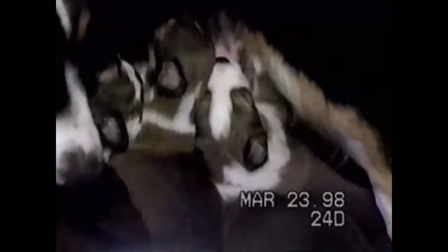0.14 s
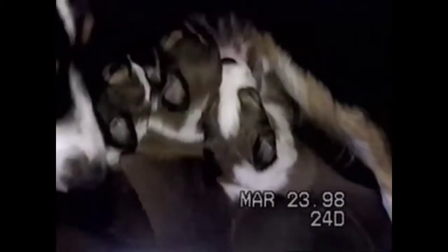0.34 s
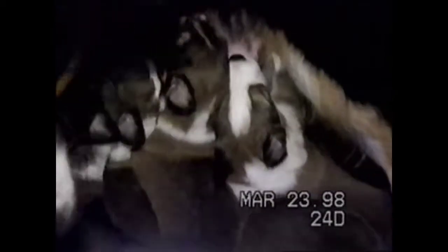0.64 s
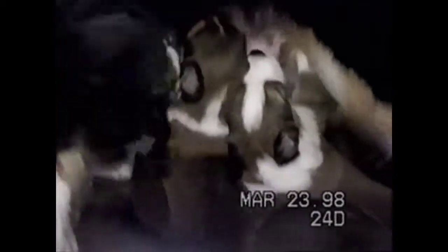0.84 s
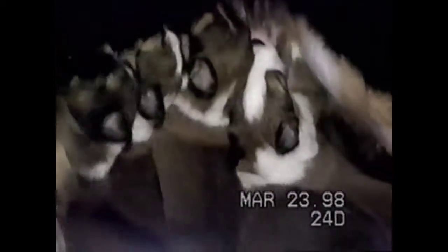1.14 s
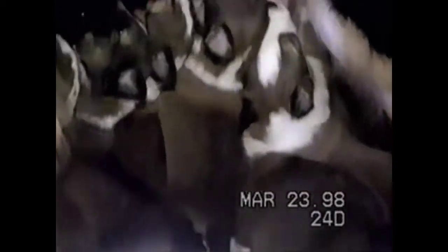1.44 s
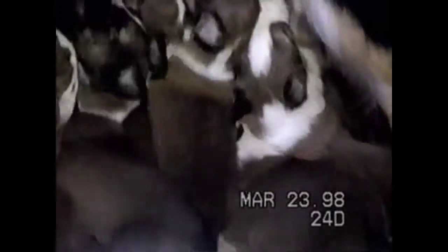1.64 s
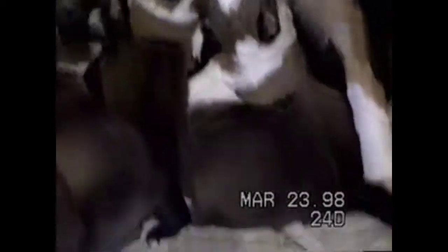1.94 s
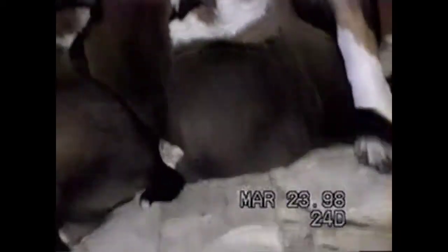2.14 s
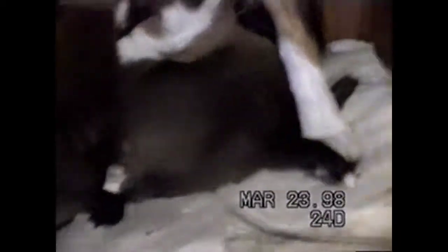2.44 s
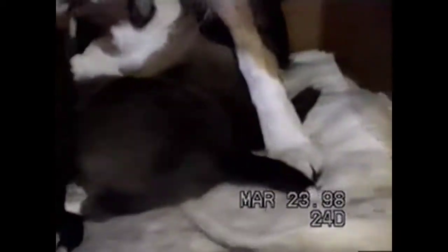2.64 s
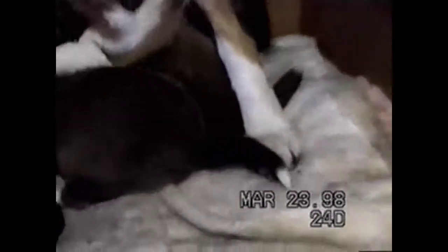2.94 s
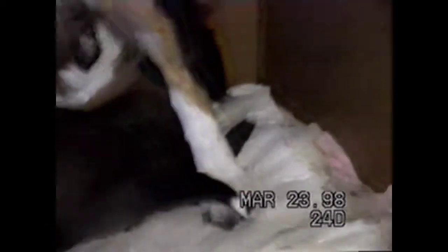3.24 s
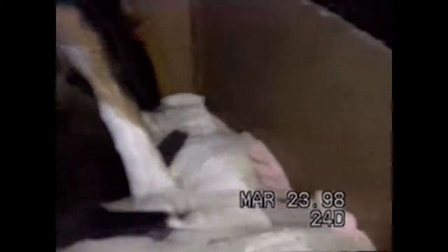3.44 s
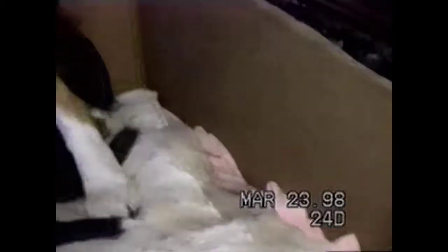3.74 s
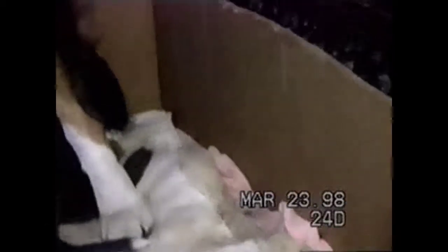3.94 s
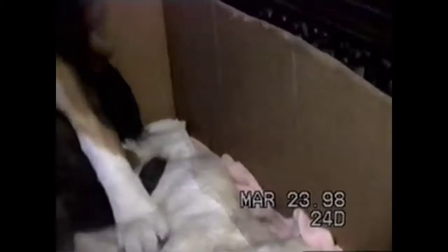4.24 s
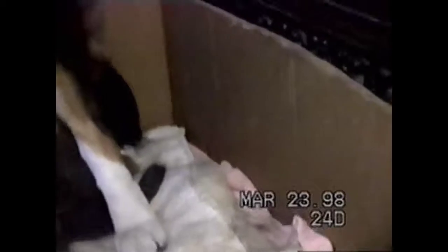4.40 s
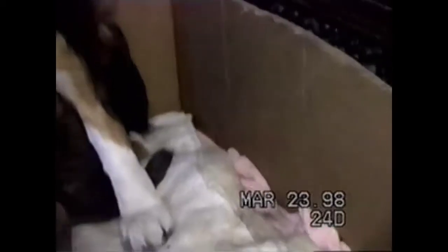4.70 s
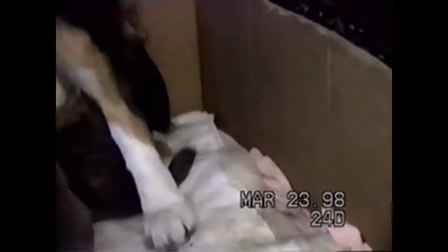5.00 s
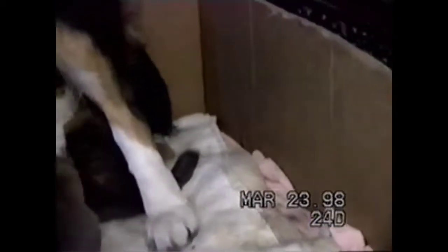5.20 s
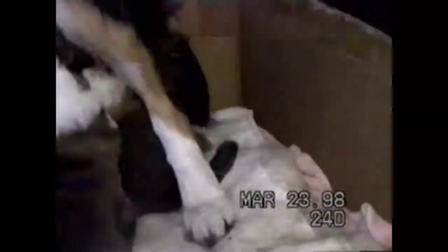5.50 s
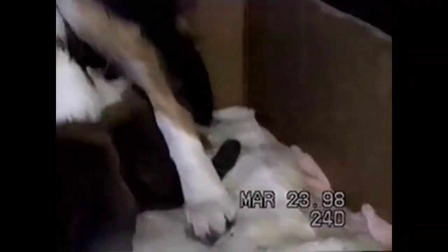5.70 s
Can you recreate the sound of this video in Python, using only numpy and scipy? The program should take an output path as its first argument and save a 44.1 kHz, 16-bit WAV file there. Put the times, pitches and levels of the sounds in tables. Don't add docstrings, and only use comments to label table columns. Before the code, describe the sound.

A young puppy whines close to the microphone in a small, fairly dry room, over low rumble, soft tape hiss and a very faint motor whine. A weak, thin squeak begins at once and swells to 0.3 s. At 0.5 s a stronger cry rises from a hoarse start to a clear high note. Longer cries follow at 1.0 and 1.7 s, each pushed again midway, the second fading; a tap lands at 1.7 s. A distant litter mate whines faintly from 1.9 to 2.5 s. More cries flip sharply from low and raspy to high at 2.5 s, 3.0 s, the loudest, and 3.6 s, which is more nasal. After a throaty rasp, a short, weak last cry ends by 4.3 s. Then a tiny grunt at 4.55 s, scattered light claw ticks and soft smacks, and bedding rustling, strongest near 5.75 s, continue to the end at about 5.9 s.

```python
import sys
import numpy as np
from scipy import signal
from scipy.io import wavfile
from scipy.ndimage import uniform_filter1d, map_coordinates

SR = 44100
rng = np.random.default_rng(int(sys.argv[2]) if len(sys.argv) > 2 else 0)


def natural_amplitude(level_db):
    exponent = np.asarray(level_db, float) / 20
    return 10 ** exponent


def digitize_waveform(pressure):
    field = np.atleast_2d(pressure).T
    bounded = np.clip(field, -1, 1)
    quanta = np.round(bounded * 32767).astype(np.int16)
    wavfile.write(sys.argv[1], SR, quanta)


N = 258420

# start_s, pitch_hz, level_db [1st partial], mouth_db [overtones against the 1st]
CRY_WEAK = [(0, 1530, -39.5, -29), (.056, 1515, -43, -28), (.126, 1550, -47.5, -12), (.16, 1540, -59, -7),
            (.2, 1530, -48, -11), (.254, 1580, -36, -13.5), (.29, 1580, -27, -39), (.305, 1553, -23.5, -30)]
CRY_RISING = [(.485, 1114, -41.5, -20), (.512, 1076, -31, -8), (.535, 1258, -29, -1.5),
              (.56, 1378, -21, -23), (.61, 1435, -27, -56), (0.644, 1431, -26.5, -36),
              (0.699, 1404, -31, -31), (0.761, 1430, -24.5, -34), (.82, 1414, -33, -36)]
CRY_LONG = [(1.009, 1135, -41, -14), (1.03, 1059, -30.5, -12), (1.046, 968, -27.5, -7.5),
            (1.067, 1030, -29.5, -8), (1.082, 1017, -30, -5), (1.086, 1368, -21, -48),
            (1.12, 1456, -30, -40), (1.152, 1460, -45.5, -34),
            (1.172, 1427, -28.5, -46), (1.207, 1353, -30, -33), (1.259, 1395, -29.5, -36),
                 (1.31, 1395, -24.5, -31.5), (1.362, 1431, -31.5, -37), (1.45, 1384, -26.5, -36),
                 (1.49, 1444, -35.5, -35)]
CRY_FADING = [(1.721, 1320, -41, -35), (1.738, 1320, -35.5, -24), (1.749, 1100, -28.5, -10),
              (1.776, 1205, -27, -8.5), (1.804, 1384, -18.5, -28), (1.834, 1367, -41.5, -18),
              (1.858, 1484, -38, -29), (1.945, 1372, -42.5, -32), (2.059, 1421, -42, -15.5),
              (2.086, 1420, -30, -17.5), (2.105, 1488, -30.5, -18.5), (2.13, 1484, -36, -15.5),
                   (2.199, 1495, -35, -14.5), (2.216, 1452, -36, -11), (2.284, 1442, -37.5, -16.5),
                   (2.31, 1510, -36.5, -17)]
CRY_FLIPPING = [(2.495, 735, -44, -19), (2.508, 770.6, -43, 6), (2.532, 847, -27.5, -17.5),
                (2.542, 980, -33.5, -9), (2.547, 1330, -20.5, -25.5), (2.589, 1408, -30.5, -26),
                (2.69, 1389, -31.5, -22.5), (2.786, 1394, -29.5, -26.5), (2.85, 1470, -36, -22.5)]
CRY_LOUD = [(3.028, 610.4, -59, 9), (3.044, 703, -43, 8.5), (3.065, 839, -25.5, -13),
            (3.069, 1110, -20, -9.5), (3.09, 1135, -19, -11), (3.13, 1340, -21, -58),
            (3.161, 1358, -18, -43), (3.175, 1360, -26.5, -44), (3.21, 1367, -25.5, -25.5),
            (3.243, 1381, -24, -24), (3.297, 1400, -27.5, -28), (3.318, 1422, -32.5, -13),
                 (3.375, 1479, -41, -9)]
CRY_OPEN = [(3.56, 844.5, -40, -25), (3.577, 857.7, -36, -8.5), (3.592, 1128, -25, -24),
            (3.614, 1245, -28.5, -1.5), (3.65, 1383, -32.5, -2.5), (3.716, 1444, -40, 3.5),
            (3.745, 1464, -30, -6), (3.788, 1421, -28, -13), (3.817, 1475, -26, -17)]
CRY_LAST = [(4.099, 934, -38.5, -8), (4.111, 1031, -44.5, 3), (4.125, 1116, -33.5, -4),
            (4.143, 1239, -37.5, -10), (4.171, 1296, -35, -40), (4.186, 1347, -44.5, -23),
            (4.212, 1353, -46, -22), (4.223, 1420, -38.5, -30), (4.23, 1272, -39.5, -38)]
# length_s, gasp_db, last_pitch_hz, sag [share of pitch]
CRY_ENDINGS = [
    (.05, -27, 1555, 0.0018),
    (.05, -36.5, 1510, .085),
    (0.04236, -33, 1450, .055),
    (0.022, -33, 1530, .002),
    (0.03, -33, 1505, 0.081),
    (.045, -38.5, 1520, 0.0665),
    (0.081, -28.5, 1560, 0.0028),
    (0.033, -37, 1278, .002),
]
# time [share of length], dip [share of sag], level_db [against gasp], mouth_db
BREAK_UP = [
    (.3, .01, -3, -23.5),
    (.55, .99, 1.5, -42),
    (.8, 0.29, -5.5, -42),
    (.99, 0.0098, -21, -40),
]
# centre_s, half_width_s
VOICE_DIPS = [(0.324, 0.0013), (0.338, 0.0027), (0.593, 0.0022), (0.825, 0.0089), (0.84, 0.0031),
              (1.153, 0.012), (1.504, 0.003), (1.801, 0.0046), (1.836, 0.0043), (1.894, 0.008),
              (2.104, 0.0014), (2.222, 0.0066), (2.825, 0.0038), (3.101, 0.00093), (3.111, .002),
              (3.121, 0.001), (3.217, 0.0057), (3.615, 0.0014), (3.8, 0.0066), (3.832, 0.018),
              (4.148, 0.0029), (4.226, 0.0006)]
# frequency_hz, level_db
MOUTH_COLOUR = [(1500, 0), (2300, 1.5), (2800, 1.5), (3500, -0.5), (4000, -1.5), (4280, 9.5), (4550, -2.5),
                (5500, -14)]
# centre_s, before_db, after_db
TONGUE_SHIFTS = [
    (.27, -4, 9.5),
    (.6, -7, 5),
    (1.09, -8.5, -10.5),
    (2.205, -9.5, -1.5),
    (2.6, -7.5, -0.5),
    (3.065, -4, -12),
    (3.665, -4, -30),
    (4.125, -19, -24),
]
# frequency_hz, level_db [rms]
MOTOR_LINES = [(2159, -79), (5033, -88), (5755, -88), (7192, -88), (7913, -89), (8629, -85), (10072, -88),
               (11509, -88)]
# frequency_hz, level_db [rms]
HUM_LINES = [(59.2, -75), (145.3, -78), (242.2, -74.5)]
# frequency_hz, density_db [per Hz]
ROOM_SPECTRUM = [(12, -36), (20, -1), (54, -10), (92, 2.5), (144, -1.5), (296, -3), (531, -1.5),
                 (610, -30.5), (741, -5.5), (901, -6), (1660, -11), (2190, -9), (3820, -19), (9830, -21),
                 (15300, -30)]
# time_s, level_db
ROOM_LEVEL = [
    (0.0, -63),
    (1.5, -67),
    (2.3, -64),
    (3.0, -66.5),
    (5.86, -67.5),
]
# centre_s, rise_db, half_width_s
STIRS = [
    (2.0, 6, .1),
    (2.4, 6.5, 0.063),
    (4.4, 4, 0.079),
    (4.6, 5.5, 0.083),
    (5.07, 1, .04),
    (5.28, 1, 0.024),
    (5.52, 3, 0.029),
    (5.75, 8, 0.055),
]
# start_s, peak_db, length_s
RASPS = [(0.486, -47, 0.038), (1.006, -48, 0.028), (1.723, -42.5, 0.093), (2.48, -42.5, 0.05),
         (2.504, -53, 0.062), (3.015, -42, 0.062), (3.551, -43.5, 0.054), (4.051, -44, 0.046),
         (4.077, -37.5, 0.063), (3.08, -33.5, 0.059), (0.256, -51, 0.059), (2.073, -57, 0.035),
         (2.85, -59, 0.022), (3.39, -51, 0.062), (3.837, -70, 0.042)]
# frequency_hz, width_hz, level_db
THROAT = [(1200, 690, -0.5), (2200, 1140, -9.5), (3250, 670, -15), (4350, 2700, -24)]
# start_s, peak_db, centre_hz, width [share of centre]
TICKS = [(0.955, -38, 163, 2.55), (0.958, -40.5, 2713, 0.39), (1.735, -32, 933.6, 0.23),
         (1.575, -47.5, 901.4, 0.82), (2.458, -52.5, 149.4, 0.26), (2.64, -49.5, 130.5, 0.4),
         (3.087, -46, 303.7, 1.05), (3.848, -48.5, 442, 0.17), (4.062, -43.5, 298, 0.87),
         (4.368, -49, 1220, 0.41), (4.52, -43, 2770, 0.53), (4.519, -47.5, 6470, 0.9),
         (4.541, -44, 1200, 0.18), (5.043, -44.5, 1250, 0.54), (5.066, -44.5, 1010, 0.31),
         (5.23, -45.5, 1000, 0.63), (5.272, -42.5, 2425, 0.25), (5.271, -53, 5000, 0.43),
         (5.39, -80, 1500, 0.88), (5.51, -49, 930, 1.4), (5.568, -49, 1010, 0.32), (5.708, -52, 1370, 0.45),
         (5.729, -46.5, 1410, 0.71), (5.819, -52, 503, 0.32), (5.844, -46.5, 1510, 0.71)]
# time_s, pitch_hz, level_db
FAR_WHINE = [
    (1.9, 1245, -56),
    (1.942, 1243, -63),
    (2.048, 1232, -62),
    (2.37, 1122, -57),
    (2.39, 1180, -59),
    (2.47, 1133, -59),
]
# centre_s, pitch_hz, peak_db, half_width_s
GRUNT = (4.556, 840, -45, .009)

CLEAR_ABOVE_HZ, CLEAR_WITHIN_HZ = 1400, 120
START_HOARSE, NOTE_HOARSE, END_HOARSE = .22, .025, .35
UPPER_FALL_DB = -3
THROAT_CUT_HZ, CUT_FALL_DB = 3800, -12
BREATH_DB = -32
WAVER_DB, WAVER_HZ, OVERTONE_WAVER_DB = .35, 22, 3.0
TONGUE_MOVE_S = 0.019
ROOM_T60_S, ROOM_DB, WALL_CUT_HZ = 0.24, -19.5, 6000
SHUFFLE_HZ = 35
TONE_TRIM_DB = 6
RUSTLE_DB, RUSTLE_LUMPS_DB, RUSTLE_LUMPS_HZ = -69.5, -1.9, 18
TICK_T60_S, TICK_T60_FALL = 0.059, 0.48
DUCK_FROM_DB, DUCK_SHARE = -36, 0.4
TAPE_RATE_HZ = 48000


def rms_one(x):
    return x / np.sqrt(np.mean(x ** 2) + 1e-20)


def drift(rate_hz, size):
    r = np.exp(-2 * np.pi * rate_hz / SR)
    noise = rng.standard_normal(size + 4000)
    settled = signal.lfilter([1], [1, -2 * r, r * r], noise)[4000:]
    return rms_one(settled)


def resonance(x, hz, width_hz):
    r = np.exp(-np.pi * width_hz / SR)
    poles = [1, -2 * r * np.cos(2 * np.pi * hz / SR), r * r]
    return signal.lfilter([(1 - r * r) / 2, 0, (r * r - 1) / 2], poles, x)


def in_time(rows, t):
    s, *columns = np.transpose(rows)
    return [np.interp(t, s, c) for c in columns]


def breath_rows(rows, ending):
    length, gasp_db, last_hz, sag = ending
    end_s = rows[-1][0]
    tail = [(end_s + share * length, last_hz * (1 - sag * dip), gasp_db + db, mouth_db, 1)
            for share, dip, db, mouth_db in BREAK_UP]
    return [(*row, 0) for row in rows] + tail


def fold_gate(breaths, t):
    spans = [(t >= rows[0][0] - .002) & (t < rows[-1][0] + .002) for rows in breaths]
    voiced = uniform_filter1d(np.max(spans, axis=0) * 1., size=90)
    for s, half in VOICE_DIPS:
        voiced = voiced * (1 - 0.67 * np.exp(-((t - s) / half) ** 2))
    return voiced


def tongue_balance(breaths, t):
    points = []
    for rows, (s, before_db, after_db) in zip(breaths, TONGUE_SHIFTS):
        points += [(rows[0][0], before_db), (s - TONGUE_MOVE_S, before_db),
                   (s + TONGUE_MOVE_S, after_db), (rows[-1][0], after_db)]
    return in_time(points, t)[0]


def partial_levels(hz, first_db, open_db, tongue_db):
    mouth_hz, mouth_db = np.transpose(MOUTH_COLOUR)
    overtones = []
    for k in (2, 3):
        colour_db = np.interp(np.log(k * hz), np.log(mouth_hz), mouth_db)
        waver_db = OVERTONE_WAVER_DB * drift(WAVER_HZ / 2, size=N)
        overtones.append(first_db + open_db + colour_db + waver_db)
    second_db, third_db = overtones
    third_db = third_db + tongue_db
    levels = [first_db + WAVER_DB * drift(WAVER_HZ, size=N), second_db, third_db]
    for k in range(1, 5):
        above_khz = np.clip(((k + 3) * hz - THROAT_CUT_HZ) / 1e3, 0, k * hz / 1e3)
        levels.append(third_db + UPPER_FALL_DB * k + CUT_FALL_DB * above_khz)
    return levels


def whines():
    t = np.arange(N) / SR
    cries = [CRY_WEAK, CRY_RISING, CRY_LONG, CRY_FADING,
             CRY_FLIPPING, CRY_LOUD, CRY_OPEN, CRY_LAST]
    breaths = [breath_rows(rows, ending) for rows, ending in zip(cries, CRY_ENDINGS)]
    hz, first_db, open_db, failing = in_time([row for rows in breaths for row in rows], t)

    chest = START_HOARSE * np.clip((CLEAR_ABOVE_HZ - hz) / CLEAR_WITHIN_HZ, 0, 1) ** 2
    hoarse = np.maximum(NOTE_HOARSE + chest, END_HOARSE * failing)
    jitter = 0.0646 * hoarse * drift(180, size=N) + 0.0017 * drift(30.8, size=N)
    phase = 2 * np.pi * np.cumsum(hz * (1 + jitter)) / SR

    levels = partial_levels(hz, first_db, open_db, tongue_balance(breaths, t))
    tone = 0
    for k, level_db in enumerate(levels, 1):
        shimmer = 1 + hoarse * (0.5 * drift(55, size=N) + 0.4 * drift(233, size=N))
        tone = tone + uniform_filter1d(natural_amplitude(level_db), size=330) * shimmer * np.sin(k * phase)

    air = resonance(resonance(rng.standard_normal(N), 1300, 1600), 830, 1500)
    breath = natural_amplitude(levels[0] + BREATH_DB) * rms_one(air)
    return np.sqrt(2) * fold_gate(breaths, t) * (tone + breath)


def room(x):
    out, dull = np.zeros(N), np.exp(-2 * np.pi * WALL_CUT_HZ / SR)
    lags = (rng.uniform(.009, .03, 10) * SR).astype(int)
    for k, lag in enumerate(lags):
        loop, state = x.copy(), [0.]
        gain = natural_amplitude(-60 * lag / SR / ROOM_T60_S)
        for i in range(lag, N, lag):
            back, state = signal.lfilter([gain * (1 - dull)], [1, -dull], loop[i - lag:i], zi=state)
            loop[i:i + lag] += back[:N - i]
        out += (loop - x) * (-1) ** k
    return out


def room_tone():
    t, out = np.arange(N) / SR, 0
    edges = 20 * 2 ** np.arange(0, 9.8, .5)
    white = rng.standard_normal((2, N))
    hz_points, db_points = np.transpose(ROOM_SPECTRUM)
    for k, (low, high) in enumerate(zip(edges, edges[1:])):
        band_filter = signal.butter(2, [low, high], "band", fs=SR, output="sos")
        band = signal.sosfilt(band_filter, white[k % 2])
        level_db = np.interp(np.log(low * high) / 2, np.log(hz_points), db_points)
        out = out + natural_amplitude(level_db + 1.2 * drift(19, size=N)) * band
    slip = 0.00016 * drift(14.0, size=N)
    lines = sum(np.sqrt(2) * natural_amplitude(db) * np.sin(2 * np.pi * hz * t + hz * slip)
                for hz, db in HUM_LINES + MOTOR_LINES)
    return natural_amplitude(in_time(ROOM_LEVEL, t)[0] + TONE_TRIM_DB) * rms_one(out) + lines


def rustle():
    t = np.arange(N) / SR
    sizes = natural_amplitude(1.1 * np.minimum(rng.exponential(1, N), 5))
    slips = rng.random(N) < 2500 / SR
    grains = sizes * rng.choice([-1, 1], N) * slips
    band = signal.sosfilt(signal.butter(2, [700, 3200], "band", fs=SR, output="sos"), grains)
    stir_db = sum(db * np.exp(-((t - s) / half) ** 2) for s, db, half in STIRS)
    lumps_db = RUSTLE_LUMPS_DB * drift(RUSTLE_LUMPS_HZ, size=N)
    return natural_amplitude(stir_db + RUSTLE_DB + lumps_db) * rms_one(band)


def rasps():
    t = np.arange(N) / SR
    air = rng.standard_normal(N) * natural_amplitude(1.8 * drift(170, size=N))
    coloured = 0
    for k, (hz, width_hz, db) in enumerate(THROAT):
        formant = resonance(resonance(air, hz, width_hz), hz, width_hz)
        coloured = coloured + natural_amplitude(db) * (-1) ** k * formant
    swell = sum(natural_amplitude(db) * np.sin(np.pi * np.clip((t - s) / length, 0, 1) ** 0.37)
                for s, db, length in RASPS)
    return rms_one(coloured) * swell


def ticks():
    out, t = np.zeros(N + 8000), np.arange(8000) / SR
    for s, db, hz, share in TICKS:
        t60_s = TICK_T60_S * (1e3 / hz) ** TICK_T60_FALL
        puff = rng.standard_normal(len(t)) * natural_amplitude(-60 * t / t60_s)
        puff = resonance(resonance(puff, hz, share * hz), hz, share * hz)
        out[round(s * SR):][:len(t)] += natural_amplitude(db) * puff / np.abs(puff).max()
    return out[:N]


def far_whine():
    t = np.arange(N) / SR
    hz, level_db = in_time(FAR_WHINE, t)
    span = (t > FAR_WHINE[0][0]) & (t < FAR_WHINE[-1][0])
    sounding = uniform_filter1d(span * 1., size=1500)
    tone = np.sin(2 * np.pi * np.cumsum(hz) / SR)
    return np.sqrt(2) * natural_amplitude(level_db) * sounding * drift(100, size=N) * tone


def grunt():
    s, hz, db, half = GRUNT
    t = np.arange(N) / SR - s
    tone = np.sin(2 * np.pi * hz * t * (1 - 1.3 * t))
    return np.sqrt(2) * natural_amplitude(db) * np.exp(-(t / half) ** 2) * tone


def scene():
    near = whines() + rasps() + ticks() + grunt()
    echo = room(near * drift(SHUFFLE_HZ, size=N))
    background = room_tone()
    low_pass = signal.butter(2, 4500, fs=SR, output="sos")
    treble = background - signal.sosfiltfilt(low_pass, background)
    power = uniform_filter1d(near ** 2, size=1500)
    duck = DUCK_SHARE * power / (power + natural_amplitude(2 * DUCK_FROM_DB))
    background = background - duck * treble
    return (near + natural_amplitude(ROOM_DB) * echo + far_whine() + rustle() + background)[None]


def top_cut(x):
    return signal.sosfilt(signal.butter(12, 15480, fs=SR, output="sos"), x)


def record(dry):
    held = np.floor(np.arange(N) * TAPE_RATE_HZ / SR + .5) * SR / TAPE_RATE_HZ
    mix = map_coordinates(dry[0], [held], order=3, mode="nearest")[None]
    return top_cut(mix)


dry = scene()
out = record(dry)
digitize_waveform(out)
```